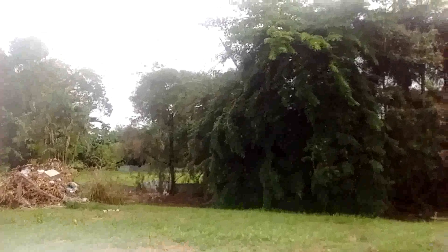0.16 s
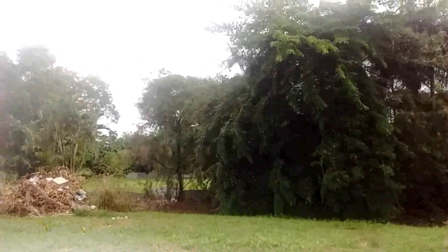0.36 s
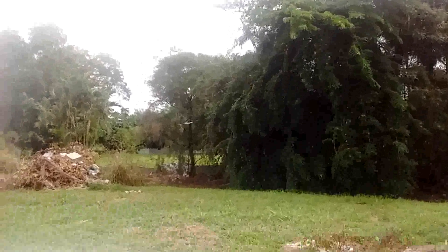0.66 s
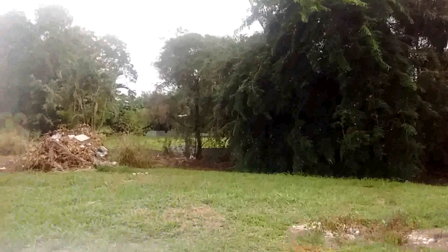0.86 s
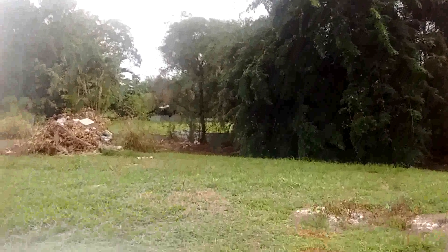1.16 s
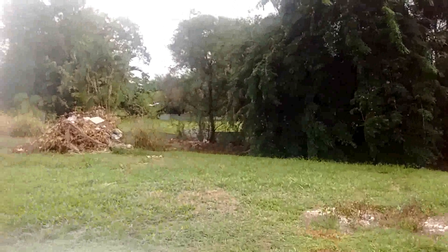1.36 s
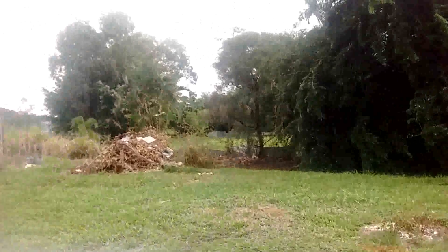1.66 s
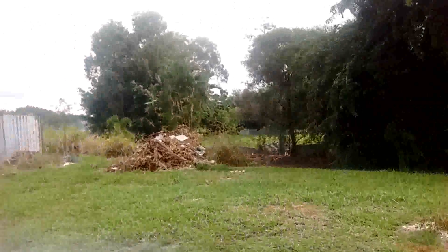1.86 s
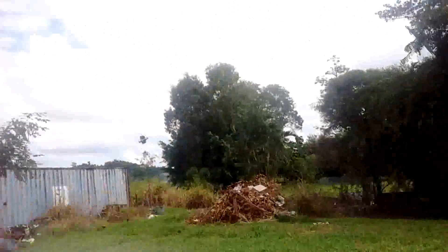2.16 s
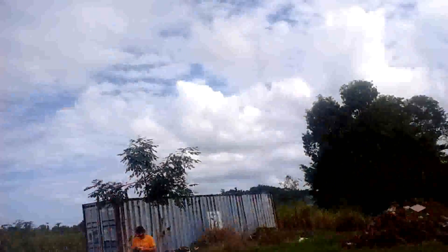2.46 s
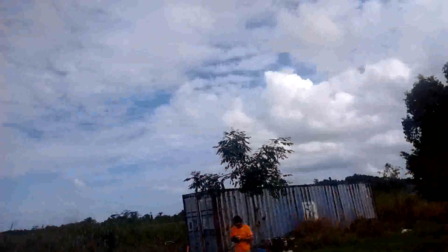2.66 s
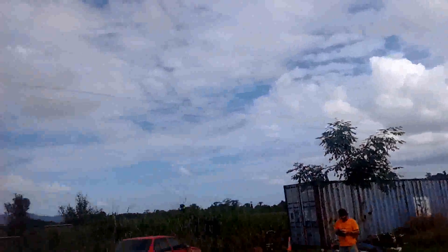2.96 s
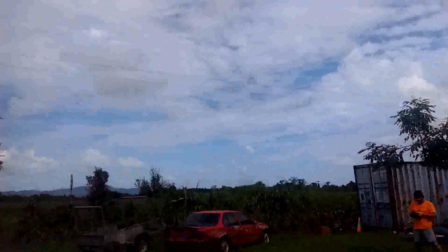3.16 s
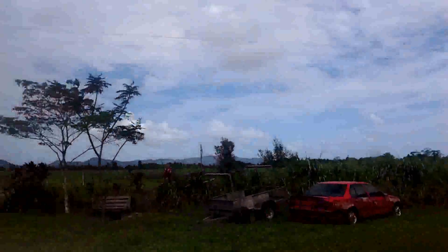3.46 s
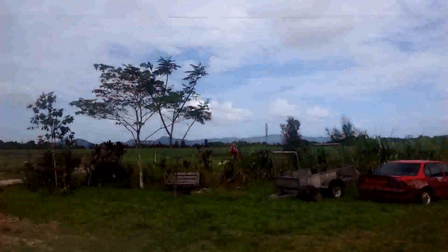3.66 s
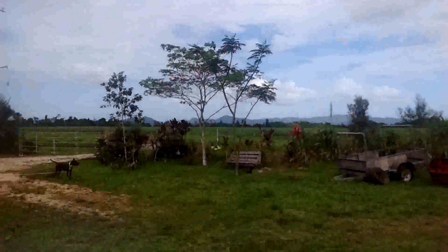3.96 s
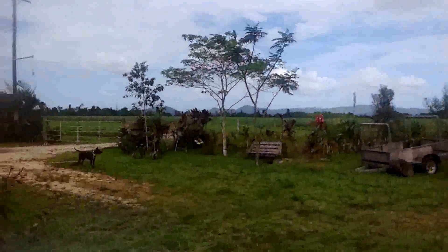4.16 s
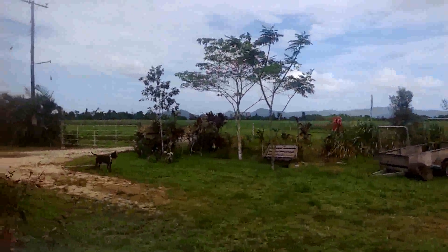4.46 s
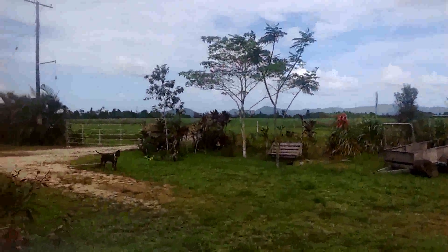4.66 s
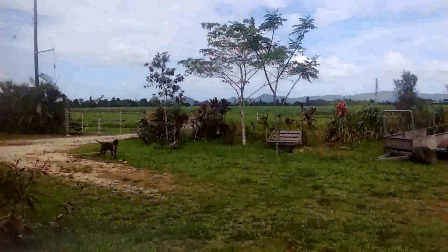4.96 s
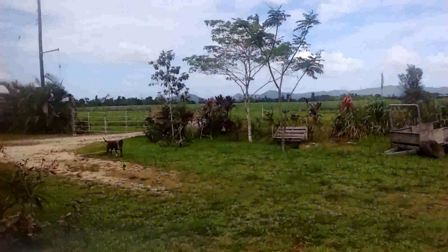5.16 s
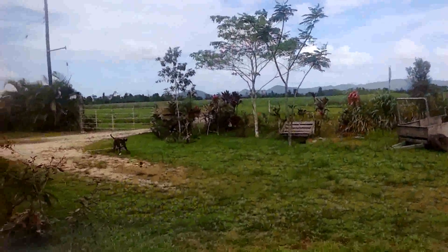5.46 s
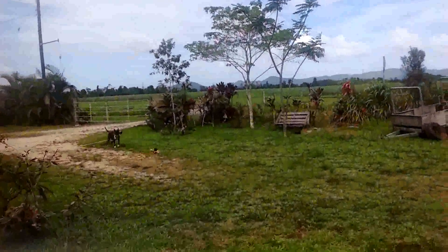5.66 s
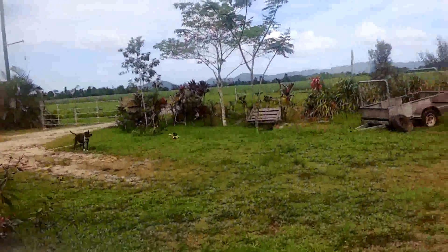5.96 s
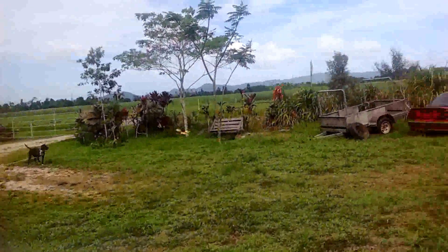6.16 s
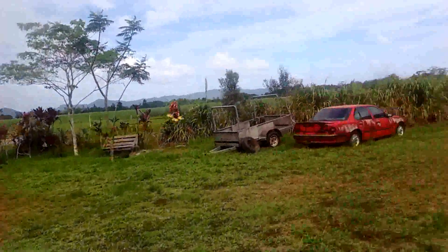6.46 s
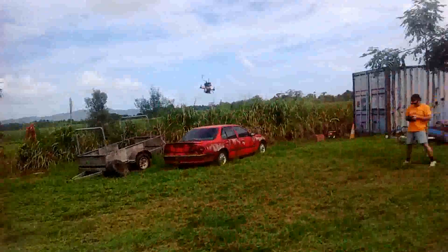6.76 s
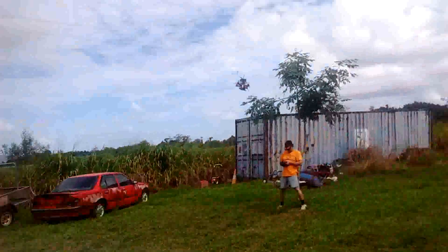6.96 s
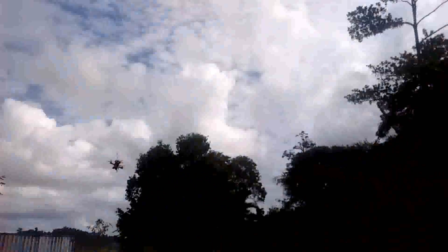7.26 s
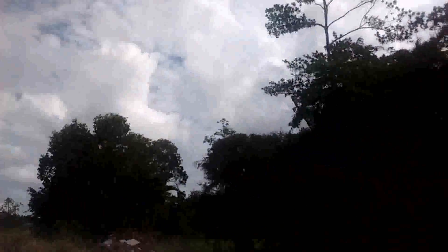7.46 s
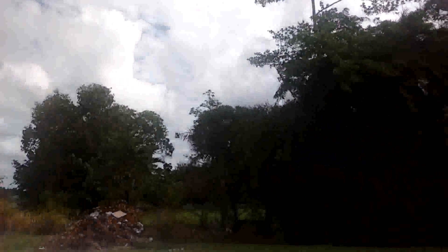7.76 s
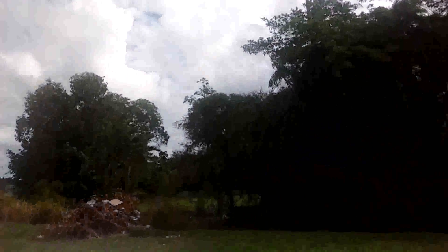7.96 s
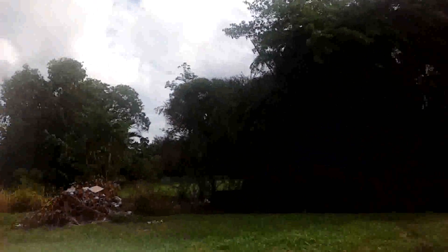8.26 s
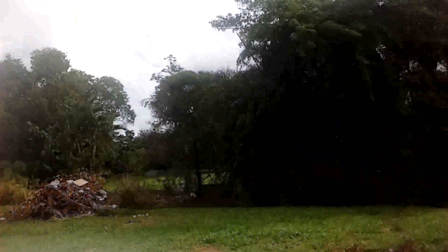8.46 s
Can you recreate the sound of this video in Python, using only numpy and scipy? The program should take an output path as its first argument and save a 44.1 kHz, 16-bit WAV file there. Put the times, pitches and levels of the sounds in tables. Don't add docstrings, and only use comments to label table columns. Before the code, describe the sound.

Several slightly mistuned rotor tones buzz together like an angry insect, swelling, dipping and swooping quickly as a little drone passes nearer and farther. Deep, blunt wind thuds hit an open handheld microphone at the start, then in scattered bursts, then heavily after seven seconds, dulling the drone each time. Behind it are a thin, high cicada chorus and a freshening breeze in trees and grass.

```python
import sys
import numpy as np
from scipy import signal
from scipy.fft import rfft, irfft, next_fast_len
from scipy.io import wavfile
from scipy.ndimage import uniform_filter1d, map_coordinates

SR = 44100
rng = np.random.default_rng(int(sys.argv[2]) if len(sys.argv) > 2 else 0)


def bounce(signal):
    frames = np.transpose(np.atleast_2d(signal))
    limited = np.clip(frames, -1, 1)
    pcm = np.round(limited * 32767).astype(np.int16)
    wavfile.write(sys.argv[1], SR, pcm)


def volts_from_decibels(level):
    exponent = np.asarray(level, float) / 20
    return 10 ** exponent


N = 380141

# (time [s], blade-pass frequency [Hz], tone level [dB])
ROTOR_A = [(0.4, 1145, -65), (0.6, 1223, -40.5), (1.25, 1234, -39.5), (1.72, 1245, -28.5), (2.0, 1113, -45),
           (2.22, 1095, -36), (2.5, 873, -43.5), (2.7, 901, -41.5), (3.15, 1201, -30), (3.45, 1149, -35),
           (3.9, 1210, -38.5), (4.3, 1290, -29), (4.7, 1003, -43), (5.45, 1294, -33), (5.7, 1135, -36),
           (6.86, 1306, -27.5), (7.43, 949.6, -36.5), (8.62, 1085, -33.5)]
ROTOR_B = [(0.5, 957, -44), (0.75, 1120, -38), (1.137, 1187, -38), (1.7, 1229, -32.5), (1.952, 1065, -38.5),
           (2.201, 1092, -47), (2.5, 879, -66), (3.099, 1143, -51.5), (3.5, 1121, -51.5), (3.801, 864, -44),
           (4.299, 1250, -37), (4.5, 1048, -44), (4.74, 929.5, -32.5), (5.06, 1110, -41), (5.5, 1247, -46),
           (6.1, 1156, -37), (7.0, 1090, -34), (7.901, 863, -33)]
ROTOR_C = [(0.7, 947, -46), (1.2, 1026, -42), (1.39, 887, -45), (1.7, 1028, -34), (1.91, 909, -52),
           (2.6, 811, -71), (3.05, 871, -41), (3.33, 861, -46), (3.45, 919, -39), (4.55, 805, -72),
           (4.73, 806, -32.5), (4.87, 944.5, -28.5), (5.08, 1048, -31.5), (5.49, 1197, -37.5),
           (5.8, 978, -38.5), (6.0, 1044, -39), (6.69, 1060, -36), (7.0, 989, -60)]
# (time [s], half length [s], speed change [Hz], tone change [dB])
CORRECTIONS_A = [(0.763, .1, 45, 6.5), (1.093, .12, 64.5, 7.5), (1.205, 0.094, 15, 4),
                 (1.754, 0.078, -0.5, 2.5), (1.4, 0.14, -90, -2.5), (1.633, 0.079, -25, -25),
                 (1.957, 0.093, -59.5, -4), (3.685, 0.25, -140, 0), (3.832, 0.068, 25, 3),
                 (3.985, 0.048, -70, 4), (4.055, 0.0454, 14.5, 4), (4.127, 0.052, -74.5, 1),
                 (4.379, 0.051, 109, 2), (4.464, 0.046, -45.5, 1), (4.524, 0.059, 91.5, 4),
                 (5.46, 0.079, 30, -1), (6.097, 0.045, -33, 0), (6.279, 0.078, 33, -7.5),
                 (6.504, 0.0566, 35, 9), (6.58, 0.051, -75, 2.5), (6.689, 0.08, 39.5, -1.5),
                 (7.004, 0.11, -69.5, 1.5), (7.648, 0.13, 64, 12.5), (7.81, 0.085, -55.5, -12),
                 (7.931, 0.096, 33.5, 3), (8.295, 0.3, 72, 6)]
CORRECTIONS_B = [(.64, 0.086, 0, 1), (0.82, 0.047, -50.5, -1), (1.001, 0.068, -20, -15),
                 (1.378, 0.22, -115, -11), (1.76, 0.06, 25, -6), (3.2, 0.2, -0.5, 26),
                 (3.59, 0.095, 20.5, 18.5), (4.023, 0.099, 61, 2.5), (4.33, .12, 30, 1),
                 (4.43, 0.045, -30.5, 11), (4.13, 0.046, -29.5, -8), (4.9, 0.16, 5.5, 10),
                 (5.06, 0.037, 29.5, 15), (5.58, 0.062, 26, 12.5), (5.28, 0.11, -70.5, 13.5),
                 (5.7, 0.11, -56.5, 7.5), (6.42, 0.22, -115, -5), (6.791, 0.084, 60, 6),
                 (6.92, 0.051, -61, -5), (7.039, 0.071, -73.5, -7), (7.549, 0.16, -68.5, -13),
                 (7.771, 0.073, 63, 15)]
CORRECTIONS_C = [
    (1.621, 0.075, 28.5, -9),
    (1.7, 0.043, -34, -7),
    (1.779, 0.072, 31.5, 6),
    (4.932, 0.052, -61, 2),
    (6.199, 0.062, -48.5, -10),
    (6.422, 0.14, -65.5, -4),
    (6.83, 0.092, -50, 5),
]
# (multiple of blade pass [ratio], level [dB])
BLADE_PARTIALS = [(.5, -12), (1, -4), (2, -3.5), (3, -7), (4, -10.5), (5, -16), (6, -16), (7, -20)]
# (time [s], lowest multiples [dB], third [dB], higher ones [dB])
DISC_TILT = [(0.0, -2, -2, -4), (0.6, 1, 0, -4), (1.1, -8, -1, -7), (1.4, -5, 2, -1), (1.75, -3, 2, -3),
             (2.15, -1, 1, -5), (2.7, 9, 2, -5), (3.2, -12, -5, -5), (3.8, -3, 5, -5), (4.05, 5, 0, -7),
             (4.33, 8, -7, -8), (4.68, -12, -3, -8), (4.84, -3, 0, 1), (5.5, 2, 5, 2), (5.75, -3, 5, 1),
             (6.5, -6, 0, -4), (6.9, -5, 1, -2), (7.3, -12, -3, -10), (8.62, -9, -4, -10)]
# (time [s], tip hiss level [dB], delay at second port [ms], top octave level [dB])
FLIGHT_PATH = [(0.0, -58, -0.013, -14), (0.6, -46.5, 0.017, -10.5), (1.1, -46.5, 0.037, -5),
               (1.4, -47, 0.046, -4), (1.75, -41, 0.034, -6), (2.15, -47, 0.04, -4),
               (2.7, -43.5, 0.016, -10), (3.2, -35.5, 0.028, -8), (3.7, -40.5, 0.0081, -11),
               (4.33, -32, 0.018, -11.5), (4.68, -41, 0.035, -11), (4.84, -37.5, 0.043, -13),
               (5.02, -40.5, 0.051, -10), (5.25, -41, 0.05, -3), (5.5, -42.5, 0.057, -8),
               (5.75, -44.5, 0.033, -7), (6.1, -42.5, .024, -7.5), (6.5, -38, 0.027, -9.5),
               (6.9, -35.5, 0.022, -5), (7.1, -41.5, -0.000016, -3.5), (7.35, -37, 0.034, -12.5),
               (8.62, -38.5, 0.0054, -10.5)]
# (time [s], frequency [Hz], level [dB])
SHAFT_HUM = [(2.9, 266.3, -75), (3.05, 287.5, -53), (3.25, 300, -54), (3.4, 288, -75), (4.3, 276.6, -68),
             (4.5, 257.7, -46), (4.85, 249.9, -53), (5.15, 278.7, -42), (5.5, 296, -36.5), (5.75, 255, -41),
             (5.92, 235.3, -37), (6.1, 254.3, -75)]
# (frequency [Hz], density [dB per Hz])
TIP_HISS_SPECTRUM = [(300, 0), (700, 0.5), (1200, 0), (2000, -2.5), (3200, 1.5), (5000, -4.5), (7000, -4.5),
                     (9000, 1.5), (11500, 0), (14000, -5.5), (15600, -1)]
# (start [s], length [s], first port level [dB], second port level [dB])
GUSTS = [(0.19, 0.5, -20.5, -49), (0.712, 0.28, -19, -27), (0.98, 0.41, -43, -42), (1.35, 0.3, -39, -35),
         (1.788, 0.4, -25.5, -23.5), (2.302, 0.2, -31, -37), (2.413, 0.3, -27, -29.5),
         (2.695, 0.21, -38, -33), (3.021, 0.25, -35.5, -29.5), (3.287, 0.2, -38, -25.5),
         (4.051, 0.3, -32.5, -50), (6.154, 0.37, -30.5, -30), (6.595, 0.31, -31.5, -27),
         (6.921, 0.21, -36, -41), (7.097, 0.3, -22.5, -27), (7.378, 0.23, -27, -35),
         (7.561, 0.28, -29, -35.5), (7.738, 0.34, -29.5, -27), (7.985, 0.45, -30, -30.5),
         (8.327, 0.39, -26, -24.5)]
# (time [s], peak level [dB], first minus second port [dB], swing [Hz])
THUMPS = [(0.23, -2, 25, 118), (0.358, -7, 9, 111), (0.375, -4, 22, 96), (0.42, -4, 16, 105),
          (0.602, -11, 15, 118), (0.646, -0.5, 30, 159), (0.774, -8, 21, 140), (0.815, 4, 14, 158),
          (0.883, -2, 4, 139), (0.898, 2.5, 13, 151), (0.93, -3, 18, 151), (0.954, 8.5, 15, 152),
          (1.149, -17, 4, 129), (1.88, -16, 1, 131), (1.933, -2, 9, 122), (2.01, -7, 9, 102.5),
          (2.04, 0, 13, 125), (2.066, 0, 29, 94), (2.096, -1, 22, 112), (2.535, 1, 10, 130),
          (2.56, -3, 11, 153.7), (2.594, 2, -7, 162.3), (2.65, 3, -9.5, 172.7), (3.346, -7, -21, 127),
          (3.727, 6, -10, 155), (4.118, -6.5, 22, 102.8), (5.892, -1.5, -11, 126.8), (6.204, -5, 3, 130.5),
          (6.288, -1, -17, 138.4), (6.701, -7, -7.5, 127.6), (7.222, 8.5, 34, 146), (7.447, -6, -20, 133),
          (7.541, -7, -9, 170.5), (7.793, 7, -11, 149), (7.862, 1.5, -13, 156.3), (7.915, 2, -7, 142.5),
          (8.404, -1, -11, 181), (8.438, 5, -7.5, 156), (8.539, 5, -15.5, 201), (8.6, -2, -6, 119)]
# (frequency [Hz], density [dB per Hz])
WIND_SPECTRUM = [(20, -3), (40, 2.5), (80, 5.5), (130, 5.5), (200, -6.5), (300, -14.5), (500, -52),
                 (900, -87), (2500, -86)]
SLAP_SPECTRUM = [(100, -17), (200, -15), (350, 5.5), (600, -16), (1200, -47), (2500, -80)]
# first port, second port (level [dB])
CALM_DB = [-40.5, -39.5]
# (frequency [Hz], width [Hz], level [dB])
CICADA_BODIES = [(7300, 450, 4), (7730, 450, 7), (8060, 750, 11.5), (8270, 1900, 10), (9040, 450, 1)]
# (time [s], level [dB])
CHORUS_SWELL = [
    (0, -40),
    (1.8, -40.5),
    (3.2, -43.5),
    (4.33, -41.5),
    (5.7, -39),
    (6.4, -42.5),
    (6.87, -40.5),
    (7.3, -41.5),
    (8.62, -33.5),
]
# (frequency [Hz], density [dB per Hz])
LEAF_SPECTRUM = [(150, 6.5), (300, -6.5), (450, -7), (650, -3), (850, -2), (1200, -7), (2200, -18),
                 (4000, -25.5), (8000, -35.5), (15000, -50)]
# (time [s], level [dB])
BREEZE = [
    (0, -42.5),
    (1.0, -42),
    (2.1, -44.5),
    (2.8, -41.5),
    (3.66, -39),
    (4.7, -40.5),
    (6.2, -34.5),
    (7.2, -31.5),
    (8.0, -29.5),
    (8.62, -19),
]
# (time [s], gain [dB])
DUCKS = [(0.3, -3), (0.65, -5), (0.961, -7), (1.935, -7), (2.07, -8), (2.599, -3.5), (3.73, -3),
         (5.89, -2.5), (6.288, -5.5), (7.225, -14), (7.8, -13.5), (8.439, -13.5)]
# (frequency [Hz], level [dB], phase turn [rad])
SECOND_PORT = [(300, -2.5, 3), (1400, -2, 2.6), (2400, -3, 2.1), (2900, -4.5, 1.9), (3600, -6, 2.5),
               (4800, -4, 2.3), (5800, -3.5, 2.05), (6900, -2.5, 2.4), (7900, 2, 0.9), (9200, 2, 1.6),
               (9900, -0.5, 0.8), (10700, -1, 0), (11700, -4, -0.8), (12400, -9, -1.6), (13100, -14, -3.6),
               (13800, -15, -7), (15600, -17, -10.3)]

GUST_RISE_S, GUST_FALL_S = 0.052, 0.055
THUMP_DB = -4
RECOVER_DB_PER_S, DUCK_S = 5.5, 0.017
SELF_NOISE_DB = -60
CROSS_MS, CROSS_SHARE, CROSS_TOP_HZ = 0.295, 0.49, 9100
TOP_CUT_HZ = 16400


def rms_one(x):
    return x / np.sqrt(np.mean(x ** 2) + 1e-20)


def in_time(rows):
    s, *columns = np.transpose(rows)
    return [np.interp(np.arange(N) / SR, s, column) for column in columns]


def drift(rate):
    r = np.exp(-80 * np.pi * rate / SR)
    noise = rng.standard_normal(N // 40 + 2002)
    slow = signal.lfilter([1], [1, -2 * r, r * r], noise)[2000:]
    return np.interp(np.arange(N) / 40, np.arange(len(slow)), rms_one(slow))


def coloured(x, spectrum):
    hz, db = np.transpose(np.array(spectrum, float))
    size = next_fast_len(N)
    axis = np.arange(1, size // 2 + 2) * SR / size
    gain = volts_from_decibels(np.interp(np.log(axis), np.log(hz), db, left=-40))
    return rms_one(irfft(rfft(x, size) * gain, size)[..., :N])


def sieve(x, order, hz, kind):
    return signal.sosfilt(signal.butter(order, hz, kind, fs=SR, output="sos"), x)


def at_ports(x, lag_ms, diffuse):
    late = map_coordinates(x, [np.arange(N) - lag_ms * SR / 1000], order=3, mode="nearest")
    unrelated = np.pad(x, (2000, 0), "reflect")[:N]
    share = np.clip(diffuse, 0, 1)
    second = np.sqrt(1 - share) * late + np.sqrt(share) * unrelated
    size = next_fast_len(N)
    hz, db, rad = np.transpose(SECOND_PORT)
    axis = np.arange(size // 2 + 1) * SR / size
    response = volts_from_decibels(np.interp(axis, hz, db)) * np.exp(1j * np.interp(axis, hz, rad))
    return np.array([x, irfft(rfft(second, size) * response, size)[:N]])


def rotor(course, corrections, tilt_db, wobble, flutter_db, rough):
    hz, level_db = in_time(course)
    s = np.arange(N) / SR
    for at, half, change_hz, change_db in corrections:
        near = slice(int((at - half) * SR), int((at + half) * SR))
        bump = np.cos(np.pi / 2 * (s[near] - at) / half) ** 2
        hz[near] += change_hz * bump
        level_db[near] += change_db * bump
    since_start, until_end = s - course[0][0] + 0.03, course[-1][0] + 0.1 - s
    sounding = np.clip(np.minimum(since_start, until_end) / 0.1, 0, 1)
    speed = uniform_filter1d(hz, size=1500) * (1 + wobble * drift(12.37) + wobble * drift(60.9))
    turn = 2 * np.pi * np.cumsum(speed) / SR
    tone = 0
    for k, db in BLADE_PARTIALS:
        tilt = tilt_db.get(min(k, 4), tilt_db[1])
        level = volts_from_decibels(db + tilt + flutter_db * drift(14 * k ** 0.56))
        jitter = rough * max(k - 2, 0) * drift(65)
        tone = tone + level * np.sin(k * turn + jitter)
    return sounding * volts_from_decibels(level_db) * tone, turn


def drone():
    hiss_db, lag_ms, top_db = in_time(FLIGHT_PATH)
    low_db, third_db, upper_db = in_time(DISC_TILT)
    tilt_db = {1: low_db, 2: 0, 3: third_db, 4: upper_db}
    course_d = np.array(ROTOR_B) * [1, 0.965, 1] + [0.06, 0, -7]
    corrections_d = np.array(CORRECTIONS_B) + [0.06, 0, 0, 0]
    rotors = [(ROTOR_A, CORRECTIONS_A), (ROTOR_B, CORRECTIONS_B),
              (ROTOR_C, CORRECTIONS_C), (course_d, corrections_d)]
    spun = [rotor(*r, tilt_db, wobble=0.0045, flutter_db=2.8, rough=0.2) for r in rotors]
    tones, turns = zip(*spun)

    chop = 1 + 0.14 * sum(np.cos(turn) for turn in turns)
    hiss = coloured(chop * rng.standard_normal(N), TIP_HISS_SPECTRUM)
    swell = volts_from_decibels(hiss_db + 8.0 + 0.8 * drift(6))
    top = sieve(np.roll(hiss, 5000), 4, 9000, "high") * swell * volts_from_decibels(top_db + 3.0)
    body = sieve(hiss, 4, 9000, "low") * swell

    tones = sum(tones)
    tones = tones - 0.035 * sieve(tones, 1, [2700, 3500], "band")
    shaft_hz, shaft_db = in_time(SHAFT_HUM)
    tones += volts_from_decibels(shaft_db + 2.78 * drift(11.4)) * np.sin(2 * np.pi * np.cumsum(shaft_hz) / SR)
    direct = at_ports(volts_from_decibels(-2.0) * tones + top, lag_ms, diffuse=0.16)
    return direct + at_ports(body, lag_ms, diffuse=0.45)


def thump(peak_db, ports_db, hz):
    t = np.arange(-800, 800) / SR
    dip = -np.cos(2 * np.pi * hz * t) * np.exp(-np.abs(3.1 * hz * t))
    weaker_db = np.minimum([[ports_db], [-ports_db]], 0)
    return volts_from_decibels(THUMP_DB + peak_db + weaker_db) * dip * [[1], [-1]]


def wind(gain):
    s = np.arange(N) / SR
    power = (volts_from_decibels(np.reshape(CALM_DB, (2, 1))) * gain) ** 2
    for start, length, *port_db in GUSTS:
        corners = [0, GUST_RISE_S, length - GUST_FALL_S, length]
        shape = np.interp(s - start, corners, [0, 1, 1, 0])
        power += volts_from_decibels(np.reshape(port_db, (2, 1))) ** 2 * shape ** 2
    lumps = np.array([volts_from_decibels(6.33 * drift(51.0)) for port in range(2)])
    buffeting = coloured(rng.standard_normal((2, N)) * lumps, WIND_SPECTRUM)
    slaps = coloured(rng.standard_normal((2, N)) * lumps ** 2.7, SLAP_SPECTRUM)
    out = (buffeting + volts_from_decibels(-22.5) * slaps) * np.sqrt(power)
    for at_s, peak_db, ports_db, hz in THUMPS:
        hit = thump(peak_db, ports_db, hz)
        length = hit.shape[1]
        at = min(round(at_s * SR) - 800, N - length)
        out[:, at:at + length] += hit
    return out


def cicadas(level_db):
    chorus = 0
    for hz, width_hz, db in CICADA_BODIES:
        r = np.exp(-np.pi * width_hz / SR)
        throb_hz = 95 * (1 + 0.01 * drift(2))
        throb = 1 + 0.2 * np.sin(2 * np.pi * np.cumsum(throb_hz) / SR)
        song = throb * rng.standard_normal(N) * volts_from_decibels(2.7 * drift(17.0))
        for _ in range(2):
            song = signal.lfilter([1, 0, -1], [1, -2 * r * np.cos(2 * np.pi * hz / SR), r * r], song)
        chorus = chorus + volts_from_decibels(db) * rms_one(song)
    return at_ports(rms_one(chorus) * volts_from_decibels(level_db + 1.0), lag_ms=0.017, diffuse=0.7)


def leaves(level_db):
    rustle = coloured(rng.standard_normal(N), LEAF_SPECTRUM)
    rustle = rustle * volts_from_decibels(level_db + 3.5 + 1.5 * drift(10))
    return at_ports(rustle, lag_ms=0.053, diffuse=0.31)


def self_noise():
    return volts_from_decibels(SELF_NOISE_DB) * rng.standard_normal((2, N))


def gain_control():
    s = np.arange(N) / SR
    climbs = [np.where(s >= at, drop_db + RECOVER_DB_PER_S * (s - at), 0) for at, drop_db in DUCKS]
    db = np.minimum(np.min(climbs, axis=0), 0)
    return volts_from_decibels(uniform_filter1d(db, size=max(1, int(DUCK_S * SR))))


def scene():
    gain = gain_control()
    around = drone() + cicadas(*in_time(CHORUS_SWELL)) + leaves(*in_time(BREEZE))
    return gain * around + wind(gain) + self_noise()


def band_limit(x):
    return signal.sosfilt(signal.butter(12, 15710, fs=SR, output="sos"), x)


def record(dry):
    lag = round(CROSS_MS * SR / 1000)
    cross = sieve(dry[::-1], 2, CROSS_TOP_HZ, "low")
    wide = dry.copy()
    wide[:, lag:] -= CROSS_SHARE * cross[:, :-lag]
    limited = 0.95 * np.tanh(wide / 0.95)
    top_cut = signal.cheby2(12, 70, TOP_CUT_HZ, fs=SR, output="sos")
    mix = signal.sosfilt(top_cut, limited)
    return band_limit(mix)


dry = scene()
out = record(dry)
bounce(out)
```